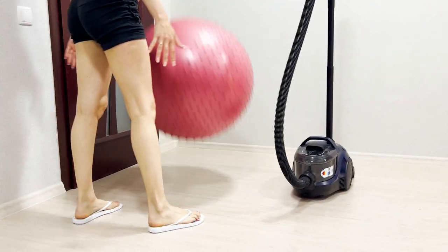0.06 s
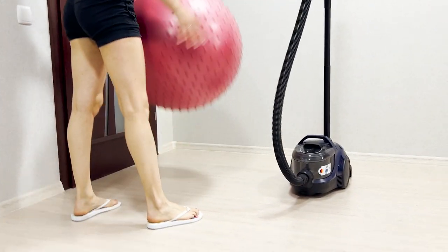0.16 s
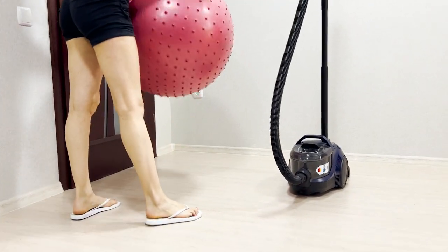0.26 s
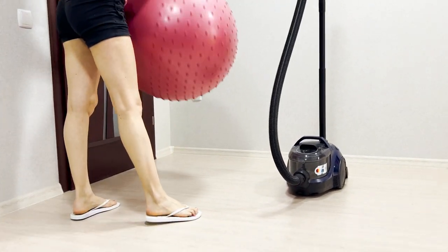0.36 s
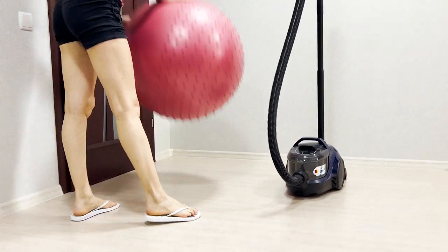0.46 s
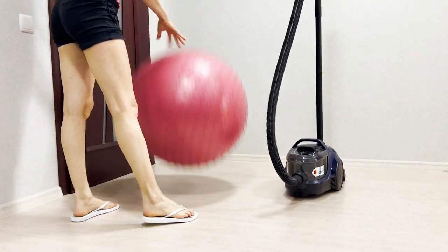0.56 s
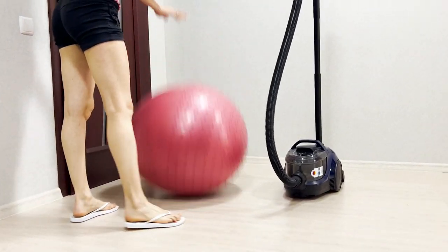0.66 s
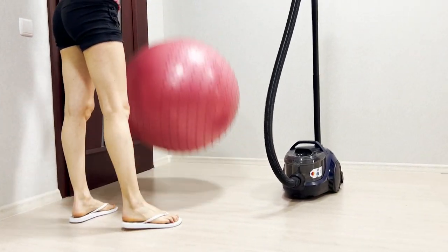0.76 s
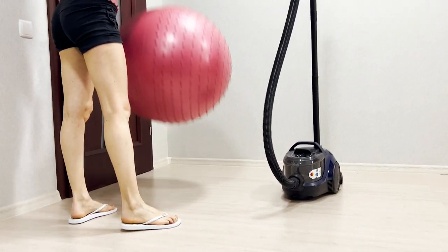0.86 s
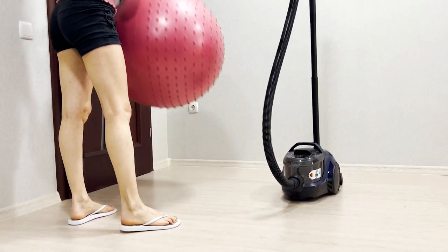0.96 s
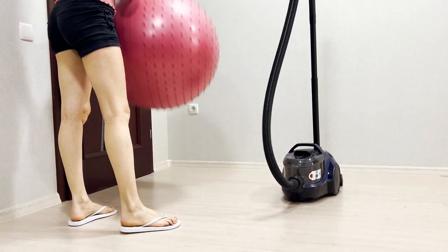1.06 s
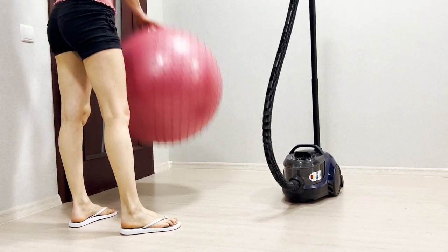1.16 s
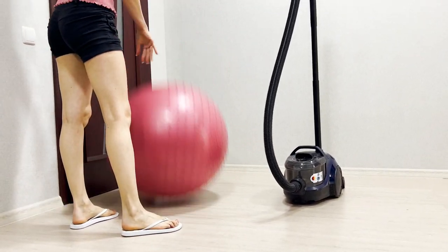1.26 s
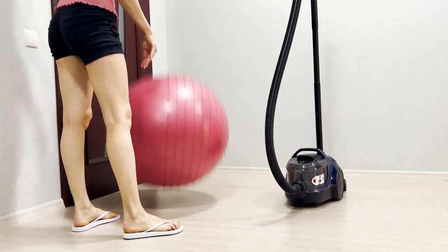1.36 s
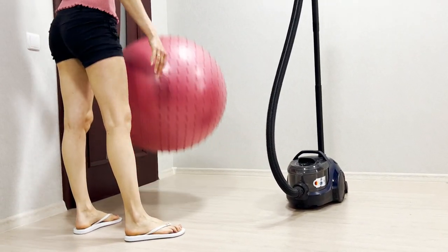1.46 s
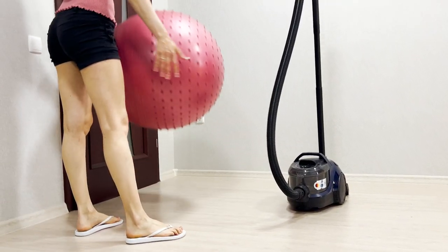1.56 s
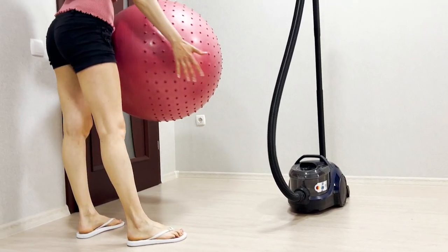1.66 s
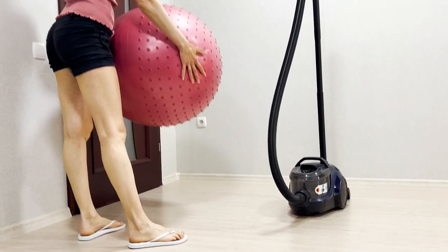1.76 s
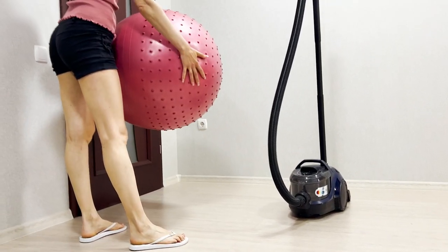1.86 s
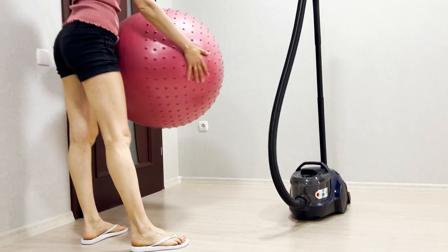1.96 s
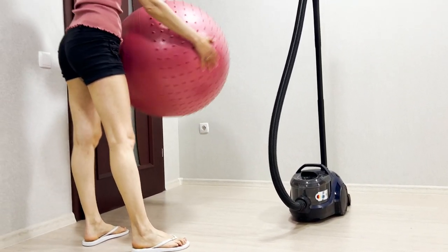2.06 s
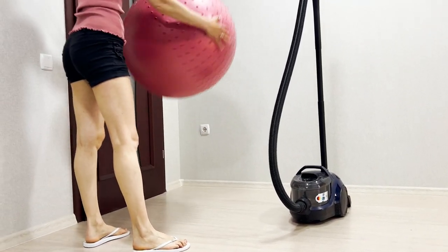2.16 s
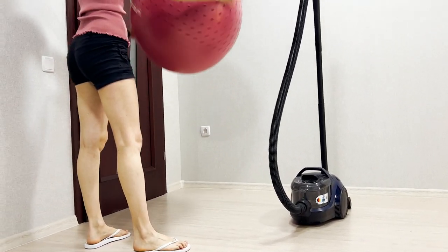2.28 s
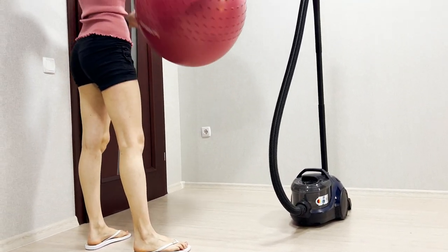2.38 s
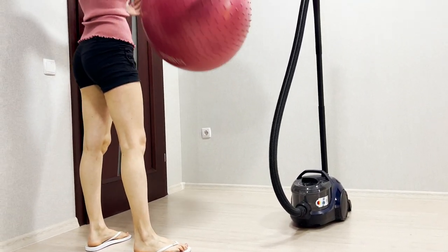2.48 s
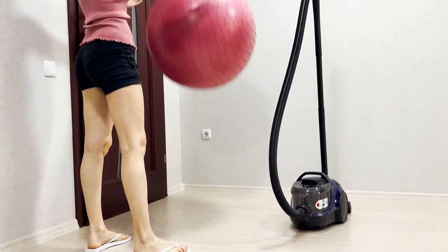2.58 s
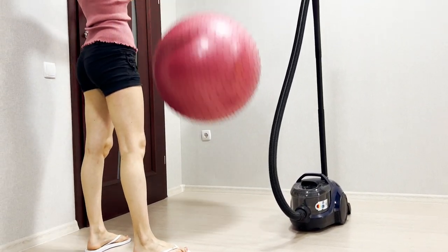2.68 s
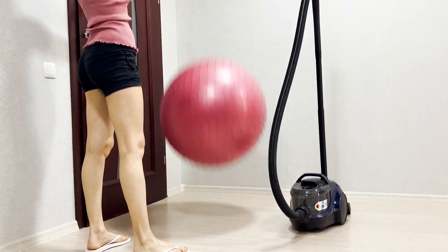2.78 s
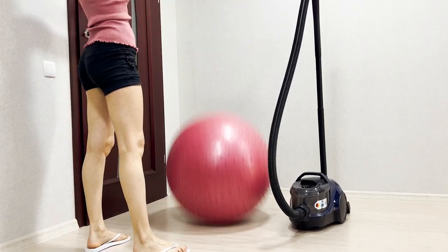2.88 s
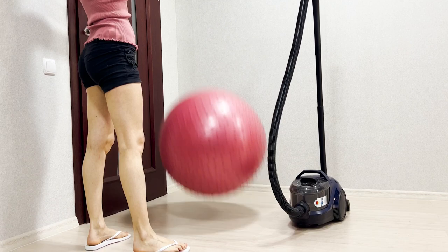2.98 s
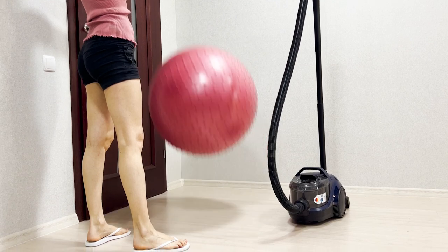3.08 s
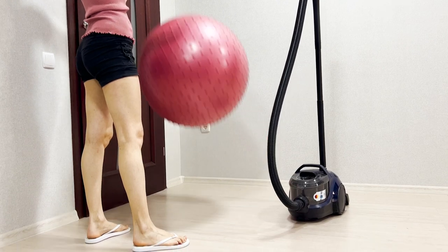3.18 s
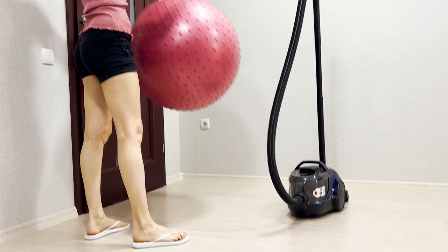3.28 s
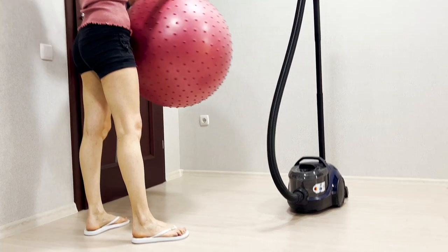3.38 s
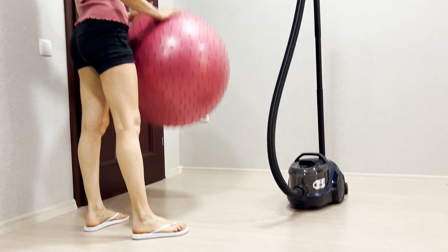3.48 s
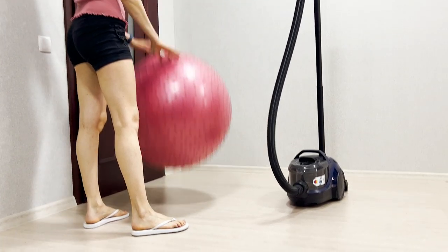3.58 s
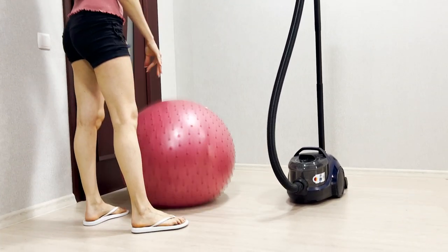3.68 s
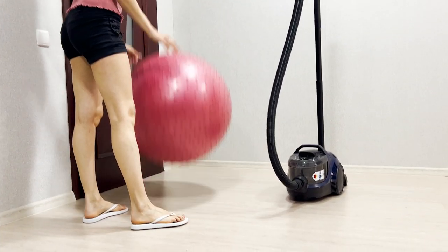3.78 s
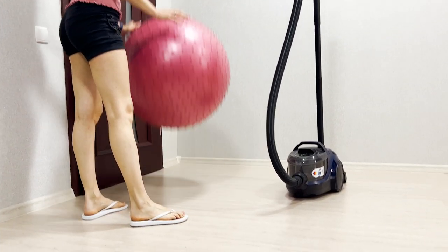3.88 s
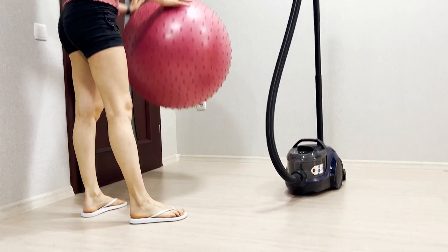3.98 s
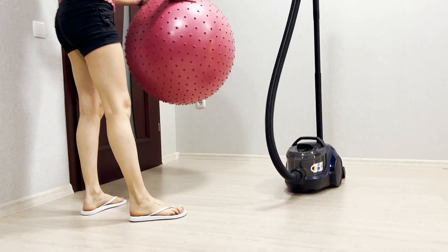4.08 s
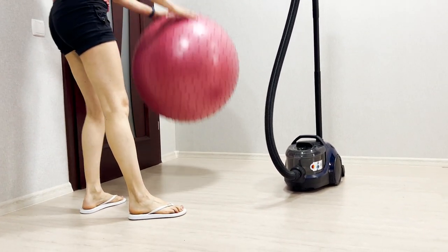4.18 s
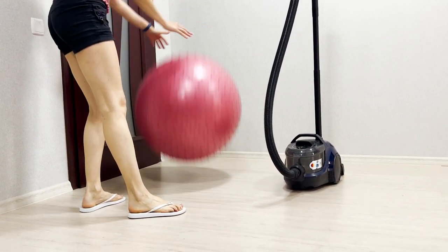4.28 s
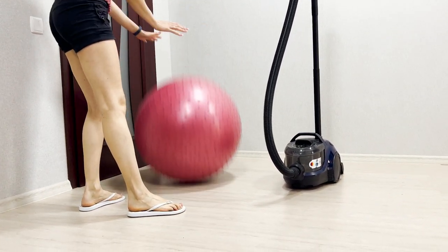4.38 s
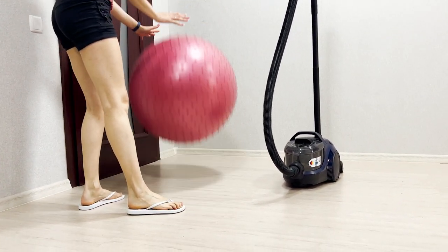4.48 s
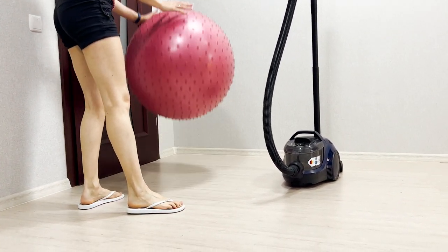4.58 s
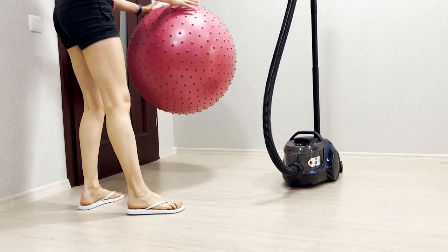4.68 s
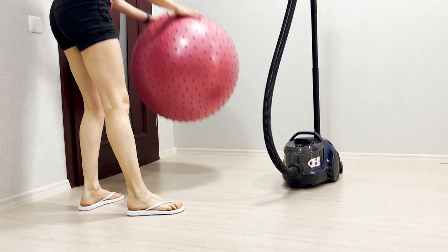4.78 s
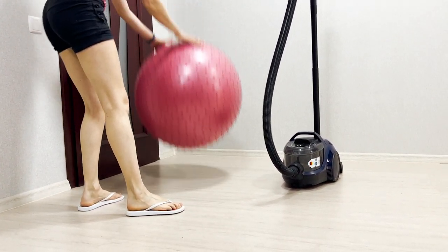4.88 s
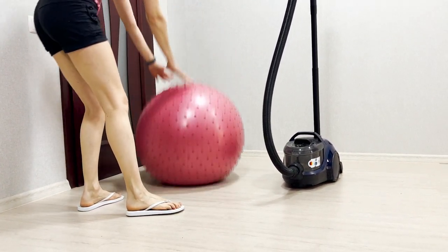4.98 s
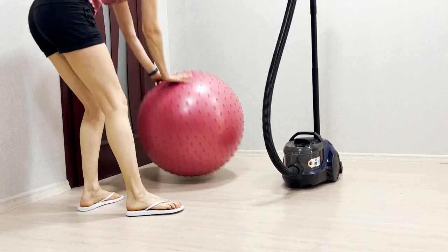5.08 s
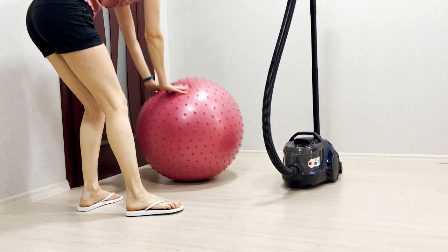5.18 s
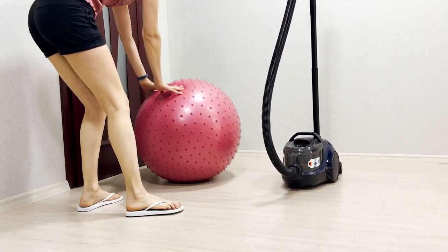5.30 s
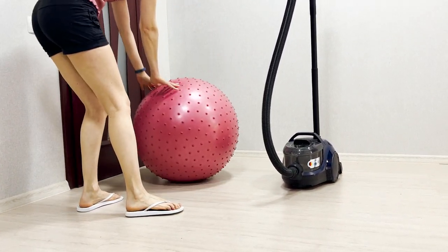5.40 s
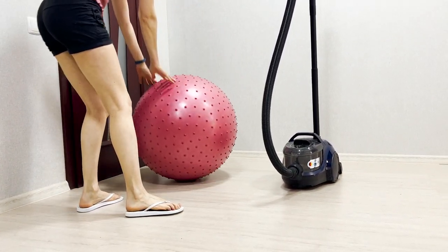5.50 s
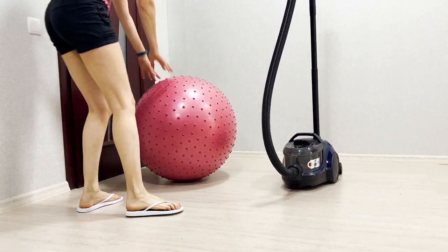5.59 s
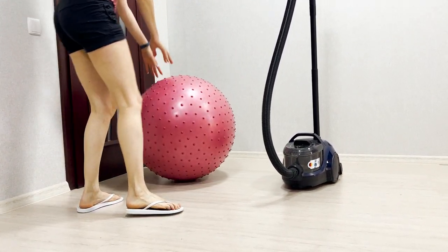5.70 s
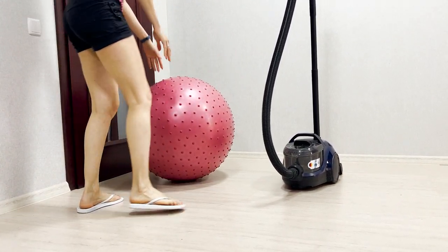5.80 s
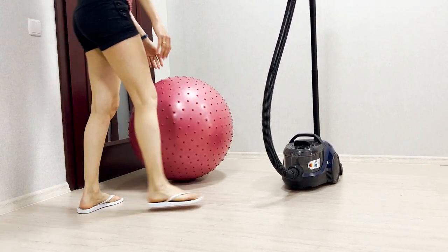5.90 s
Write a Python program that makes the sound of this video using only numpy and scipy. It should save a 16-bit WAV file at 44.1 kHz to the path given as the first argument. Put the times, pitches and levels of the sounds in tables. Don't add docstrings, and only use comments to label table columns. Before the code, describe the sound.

Hollow, ringing thumps of a large exercise ball bouncing on laminate in a small bare room, with quiet palm pats and rubbery creaks.

```python
import sys
import numpy as np
from scipy import signal
from scipy.fft import rfft, irfft, next_fast_len
from scipy.io import wavfile
from scipy.ndimage import uniform_filter1d

SR = 44100
rng = np.random.default_rng(int(sys.argv[2]) if len(sys.argv) > 2 else 0)


def ratio_of_db(decibels):
    return 10 ** (np.asarray(decibels, float) / 20)


def wav_out(sig):
    wavfile.write(sys.argv[1], SR, np.round(np.clip(np.atleast_2d(sig).T, -1, 1) * 32767).astype(np.int16))


N = 261954
BLOW_SAMPLES = 24000

# pitch_hz, level_db, t60_s
BOOM_MODES = [(56.1, -6.5, 0.92), (71.7, -12.5, 0.14), (85.36, 9, 0.21), (109, 10.5, 0.19),
              (120.7, -2, 0.19)]
# pitch_hz, level_db, t60_s
SKIN_MODES = [(143.9, -1, 0.22), (169.3, 5.5, 0.13), (191.3, -7, 0.25), (207, -3, 0.3), (237.7, -6, .25),
              (263.9, -4, .3), (301.1, -8.5, 0.36), (352.7, -10.5, 0.45), (372.5, -16, 0.26),
              (401.1, -6.5, 0.27), (415, -19, 0.14), (477, -29.5, 0.19)]


def unit(x):
    return x / np.sqrt(np.mean(x ** 2))


def across(table, size, axis=1):
    hz = np.maximum(np.arange(size // 2 + 1) * SR / size, 1)
    return np.interp(np.log(hz), np.log([row[0] for row in table]), [row[axis] for row in table])


def colour(x, table):
    gain = ratio_of_db(across(table, len(x)))
    return irfft(rfft(x) * gain / np.sqrt(np.mean(gain ** 2)), len(x))


def noise(table, size):
    return colour(rng.standard_normal(size), table)


def even(x, bins):
    spectrum = rfft(x)
    power = uniform_filter1d(np.abs(spectrum) ** 2, size=bins)
    return irfft(spectrum / np.sqrt(power), x.shape[-1])


def add(track, start_s, x):
    i = int(start_s * SR)
    lo, hi = max(i, 0), min(i + len(x), N)
    fade = np.minimum(np.linspace(3, 0, len(x)), 1) ** 2
    track[lo:hi] += (x * fade)[lo - i:hi - i]


def ring(modes, scatter_db, detune, sag):
    t = np.arange(BLOW_SAMPLES)[:, None] / SR
    hz, db, t60_s = np.transpose(modes)
    level_chance, pitch_chance = rng.standard_normal((2, len(modes)))
    slackened_s = t + sag * 0.054 * (1 - np.exp(-t / 0.046))
    turns = hz * (1 + detune * pitch_chance) * slackened_s
    decay = np.exp(-np.log(1000) * t / t60_s)
    return (np.sin(2 * np.pi * turns) * decay) @ ratio_of_db(db + scatter_db * level_chance)


def struck(force, modes, scatter_db=2.0, detune=0.015, sag=0.065):
    out = signal.fftconvolve(force, ring(modes, scatter_db, detune, sag))[:BLOW_SAMPLES]
    return out / np.sqrt(2 * np.max(uniform_filter1d(out ** 2, size=SR // 50)))


def room_hum():
    # freq_hz, level_db
    hum_colour = [(30, -0.5), (60, 13.5), (100, 11), (170, -3), (450, -4.5), (800, 0), (1030, 6.5),
                  (1300, -4), (1620, 3), (2000, -17), (4000, -21), (8000, -21.5), (12000, -27.5),
                  (16000, -33)]
    swell = unit(uniform_filter1d(rng.standard_normal(N), size=SR // 8))
    return ratio_of_db(-71 + 1.1 * swell) * np.array([noise(hum_colour, N), noise(hum_colour, N)])


def room(x, wet_db, late_db, late_share, build_s):
    # freq_hz, t60_s, share_db
    octaves = [(59.5, 0.48, -3), (128, 0.34, -6.5), (246.6, 0.32, -3), (498.5, 0.28, -1.5),
               (1060, 0.33, 2.03), (2160, 0.34, 0.46), (3900, 0.5, -2.35), (8100, 0.32, 1.2),
               (14000, 0.23, -3.2)]
    t, tails = np.arange(SR) / SR, np.zeros((2, SR))
    for k, (hz, t60_s, share_db) in enumerate(octaves):
        weight = across([(row[0], 1.0 * (j == k)) for j, row in enumerate(octaves)], SR)
        band = irfft(rfft(rng.standard_normal((2, SR))) * np.sqrt(weight), SR)
        fade = ratio_of_db(-60 * t / t60_s) + ratio_of_db(late_db - 60 * late_share * t / t60_s)
        tails += ratio_of_db(share_db) * band * fade
    tails *= (1 - np.exp(-t / build_s)) * ratio_of_db(wet_db)
    tails[:, 0] += 1
    return signal.fftconvolve(x[None], tails, axes=1)[:, :N]


def creaks():
    # start_s, level_db, pitch_hz
    ticks = [(0.45, -40, 800), (0.472, -33, 1050), (0.497, -41, 800), (1.665, -50, 500), (1.733, -34, 650),
             (1.753, -30, 950), (2.504, -60, 4400), (2.632, -68, 4200), (2.84, -64, 4500),
             (2.905, -24, 11500), (2.908, -27, 7500), (2.918, -30, 12000), (3.324, -42, 1200),
             (3.359, -44, 1300), (3.39, -45, 700), (4.676, -42, 750), (4.717, -44, 900)]
    decay_cycles, decay_s = 0.7, 0.0006
    out, t = np.zeros(N), np.arange(SR // 20) / SR
    for start_s, db, hz in ticks:
        decay = np.exp(-t / (decay_cycles / hz + decay_s))
        add(out, start_s, ratio_of_db(db) * np.sin(2 * np.pi * hz * t) * decay)
    return out


def hands():
    # start_s, held_s, rumble_db, hiss_db
    touches = [(0, .12, -57.5, -67.5), (0.241, .02, -29, -57), (0.34, 0.11, -32.5, -61.5),
               (0.5, 0.12, -44, -60.5), (1.035, 0.026, -16, -58), (1.651, 0.035, -48.5, -69.5),
               (1.739, 0.03, -31, -64.5), (1.921, 0.12, -52, -71), (2.07, 0.032, -31, -73.5),
               (2.151, 0.085, -39.5, -70), (2.3, .08, -48.5, -76.5), (3.41, 0.054, -25, -60),
               (3.918, 0.11, -40.5, -70), (4.12, 0.011, -26.5, -51.5), (4.54, 0.021, -36.5, -69.5),
               (4.79, 0.098, -45.5, -73.5), (5.129, .05, -20, -60), (5.29, .17, -39, -75),
               (5.76, .2, -81, -92)]
    # freq_hz, level_db
    rub_colour = [(300, -1), (800, 3.5), (1700, 11), (3000, 6), (6000, 2.5), (9000, -1), (13000, -2),
                  (15500, -5)]
    grip_s, rumble_fade_db_s, rub_fade_db_s = 0.0053, 164.5, 137
    start_s, held_s, rumble_db, hiss_db = np.transpose(touches)[:, :, None]
    t = np.arange(N) / SR - start_s
    grip, released_s = np.clip(t / grip_s, 0, 1), np.maximum(t - held_s, 0)
    rumble = np.max(grip * ratio_of_db(rumble_db - 7.5 - rumble_fade_db_s * released_s), axis=0)
    rub = np.max(grip * ratio_of_db(hiss_db - 0.5 - rub_fade_db_s * released_s), axis=0)

    nudges = (rng.random(N) < 120 / SR) * rng.standard_normal(N)
    damped = [(hz, db, 0.22 * t60_s) for hz, db, t60_s in BOOM_MODES]
    damped += [(hz, db - 7, 0.25 * t60_s) for hz, db, t60_s in SKIN_MODES]
    shake = unit(signal.fftconvolve(nudges, ring(damped, 0, 0, 0))[:N])
    patches = unit(uniform_filter1d(rng.standard_normal(N), size=SR // 40))
    return rumble * shake + rub * ratio_of_db(0.79 * patches) * noise(rub_colour, N)


def favoured_modes():
    # start_s, level_db, pitch_hz, t60_s
    favoured = [(-.079, -47, 2050, .9), (-.079, -45, 2320, .9), (2.33, -60, 1900, .15),
                (.62, -22, 400, .15), (.62, -14, 161, .24), (.62, -28, 942, .26), (.62, -26, 2196, .15),
                (1.279, -17, 1010, .12), (1.279, -30, 2046, .45), (2.904, -30, 1222, .1),
                (2.904, -24, 1793, .18), (2.904, -44, 2040, .9), (2.904, -44, 2310, .9),
                (3.672, -16, 170, .2), (3.672, -26, 818, .2), (4.355, -8, 140, .15), (4.352, -20, 340, .2),
                (4.348, -24, 2330, .2), (5.12, -36, 2100, .12), (.445, -15, 90, .12), (1.1, -18, 85, .15),
                (2.07, -32, 80, .12), (2.24, -36, 100, .12), (5.47, -38, 110, .08), (5.51, -38, 110, .08),
                (4.985, -21, 1690, .17), (5.12, -31, 1690, .13)]
    wobble_db, wobble_turns, wobble_s, swell_cycles = 3, 0.2, 0.008, 1.5
    out, t = np.zeros(N), np.arange(BLOW_SAMPLES) / SR
    span = int(wobble_s * SR)
    for start_s, db, hz, t60_s in favoured:
        tremble = uniform_filter1d(uniform_filter1d(rng.standard_normal((2, BLOW_SAMPLES)), span), span)
        level_wobble, phase_wobble = unit(tremble) * min(hz / 1000, 1)
        envelope = ratio_of_db(db - 60 * t / t60_s + wobble_db * level_wobble) * (1 - np.exp(-t * hz / swell_cycles))
        add(out, start_s, envelope * np.sin(2 * np.pi * (hz * t + wobble_turns * phase_wobble)))
    return out


def blows(events, rise_s, crack_s, flap_s, flap_db, air_db, slap_db, boom_db, body_db, fizz_db, lag_s, contact_s):
    # pitch_hz, level_db, t60_s
    air_modes = [(645, -7, 0.37), (760, -24, 0.32), (1058, 5.5, 0.52), (1083, 3.5, 0.49), (1370, 1.5, .3),
                 (1485, 8.5, 0.16), (1664, -8.5, .25), (1900, -6, 0.22), (2040, -9, .45), (2160, 5.5, 0.19),
                 (2410, 4, 0.26), (2810, -1, 0.36), (2900, -4.5, 0.056)]
    # freq_hz, level_db
    slap_colour = [(250, -21.5), (500, -4.5), (800, -1), (1100, -1.5), (1600, 0.5), (2200, -5.5),
                   (3000, -8), (4000, -18), (5500, -33), (8000, -44), (12000, -62)]
    # freq_hz, level_db
    fizz_colour = [(2000, -22.5), (4000, 8.5), (6000, 4.5), (9000, 2.5), (13000, -1), (15500, -6.5)]
    tilt_db_octave, lead_s = 0.69, 1 / 100
    out, t = np.zeros(N), np.arange(BLOW_SAMPLES) / SR
    octaves = np.log2(np.array(slap_colour)[:, 0] / 1500)
    tilted_slap = slap_colour + np.outer(tilt_db_octave * octaves, [0, 1])
    quiet = np.zeros(SR // 100)
    shape = (1 - np.exp(-t / rise_s)) * (np.exp(-t / crack_s) + ratio_of_db(flap_db) * np.exp(-t / flap_s))
    press = np.sin(np.pi * np.minimum(t / contact_s, 1) ** 0.5)
    for start_s, db, boom, body, fizz in events:
        crack = even(np.append(quiet, shape * rng.standard_normal(BLOW_SAMPLES)), bins=150)
        crack *= np.linalg.norm(shape)
        slap, rasp = colour(crack, tilted_slap), colour(crack, fizz_colour)
        add(out, start_s - lead_s, ratio_of_db(db + slap_db) * slap + ratio_of_db(db + fizz + fizz_db) * rasp)
        air = struck(slap[len(quiet):], air_modes, sag=0)
        add(out, start_s, ratio_of_db(db + slap_db + air_db) * air)
        push = press * rng.standard_normal(BLOW_SAMPLES)
        low = ratio_of_db(boom + boom_db) * struck(push, BOOM_MODES)
        low += ratio_of_db(body + body_db) * struck(even(push, bins=20), SKIN_MODES)
        add(out, start_s + lag_s, ratio_of_db(db) * low)
    return out


def squashes():
    # boom_db, body_db, fizz_db
    presses = [
        (5.118, -21.5, -1.3, -3, -42),
        (2.32, -47.5, -2, -7.5, -35),
    ]
    return blows(presses, rise_s=0.006, crack_s=0.0096, flap_s=0.04, flap_db=-14, air_db=-18.5,
                 slap_db=-5, boom_db=0.6, body_db=-0.9, fizz_db=5.5, lag_s=0.004, contact_s=0.045)


def pats():
    # boom_db, body_db, fizz_db
    touchdowns = [(0.238, -26, 2, 7, -21.5), (0.389, -47.5, 24, 21, -24.5), (0.448, -41, 18, -1.5, -23.5),
                  (1.032, -33, 7.5, 4, -14), (1.119, -40.5, 14.5, 11.5, -23), (1.733, -39.5, 2.5, 3, -21.5),
                  (1.751, -26, 1, 9, -19.5), (2.067, -52, 20, 16, -13.5), (2.24, -50.5, 12.5, 5, -21.5),
                  (3.415, -33.5, 8, 12, -15), (3.435, -29.5, 12, 9.5, -19.5), (4.029, -45, 10.5, -7, -24.5),
                  (4.116, -46, 21.5, 3, -17), (4.133, -37, 4, 2.5, 1), (4.558, -40.5, 1.5, 13, -21.5),
                  (4.78, -49.5, 8, 14, -30), (5.419, -62, 6, 6.5, -24), (5.468, -53, 15, 11, -24),
                  (5.508, -61, 18, -2, -23)]
    return blows(touchdowns, rise_s=0.004, crack_s=0.0046, flap_s=0.04, flap_db=-11.5, air_db=-19,
                 slap_db=-7.5, boom_db=0.5, body_db=-5.5, fizz_db=-1.5, lag_s=0.0015, contact_s=0.021)


def landings():
    # boom_db, body_db,
    # fizz_db
    earlier = [
        (-0.079, 3.7, -18, -14, -38),
               (0.619, -7.5, -7.5, -4, -32.5),
        (1.279, -7.5, -9.5, -6.5, -38.5),
        (2.904, -4.5, -10.5, -7.5, -21.5),
        (3.672, -7, -13.5, -4, -40.5),
        (4.348, -7, -8, -7, -41),
        (4.984, -11.5, -8, -4, -38),
    ]
    return blows(earlier, rise_s=0.00072, crack_s=0.0028, flap_s=0.039, flap_db=-20.0, air_db=-40.5,
                 slap_db=1, boom_db=2.5, body_db=-1.4, fizz_db=5.5, lag_s=0.003, contact_s=0.042)


def scene():
    ball = landings() + pats() + squashes() + favoured_modes() + hands()
    in_room = room(ball, wet_db=-31, late_db=-26, late_share=0.28, build_s=0.0069)
    return in_room + creaks() + room_hum()


def phone_ports(dry):
    # freq_hz, left_minus_right_db, right_lead_rad, likeness_0_to_1
    port_offsets = [(20, 0, 3.5, 0.97), (61, -1, 0.23, 1), (197, -1, 0.39, 0.93), (318.6, -1.5, 1, .93),
                    (510, 8, 2.5, 0.2), (755, 6.5, 5.5, 0), (1010, 9, 1, 0), (1496, 2.5, 2.6, 0.1),
                    (1795, 2, 0.95, 1), (3080, 6.5, -0.27, 0), (4600, 7, -0.8, 1), (5770, 7.5, 2, 0.3),
                    (7260, -1.5, 0, 1), (10050, 2.5, 3, 1), (12800, 0.5, 6.5, 0.98), (14640, 1.5, 8, 0.95)]
    high_pass = signal.butter(6, 51, "high", fs=SR, output="sos")
    thinned = signal.sosfilt(high_pass, dry) + ratio_of_db(-17) * dry
    here, there = rfft(thinned, next_fast_len(N + SR))
    size = 2 * (len(here) - 1)
    alike = np.clip(across(port_offsets, size, axis=3), 0, 1)
    shade = ratio_of_db(across(port_offsets, size) / 2)
    lead = np.exp(1j * across(port_offsets, size, axis=2))
    right = (alike * here + np.sqrt(1 - alike ** 2) * there) * lead / shade
    return irfft(np.array([here * shade, right]), size)[:, :N]


def top_cut(x):
    return signal.sosfilt(signal.butter(12, 15980, fs=SR, output="sos"), x)


def record(dry):
    mix = np.tanh(0.82 * phone_ports(dry)) / 0.76
    return top_cut(mix)


dry = scene()
out = record(dry)
wav_out(out)
```